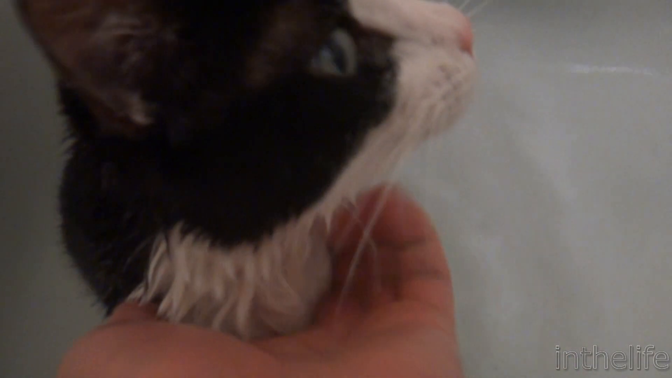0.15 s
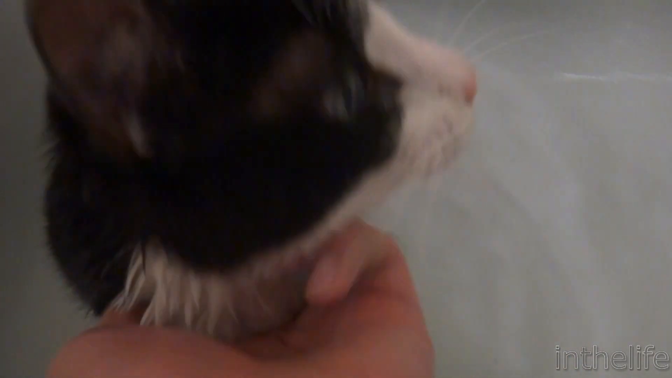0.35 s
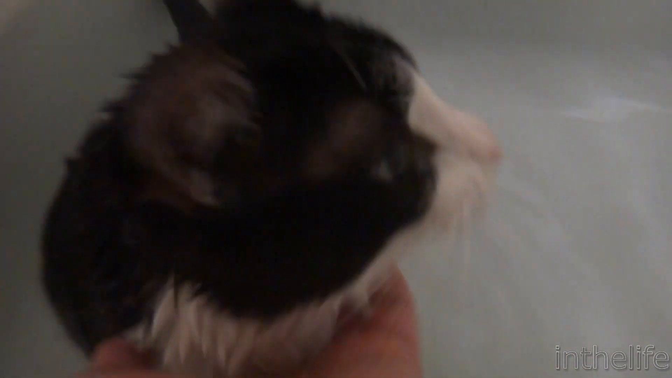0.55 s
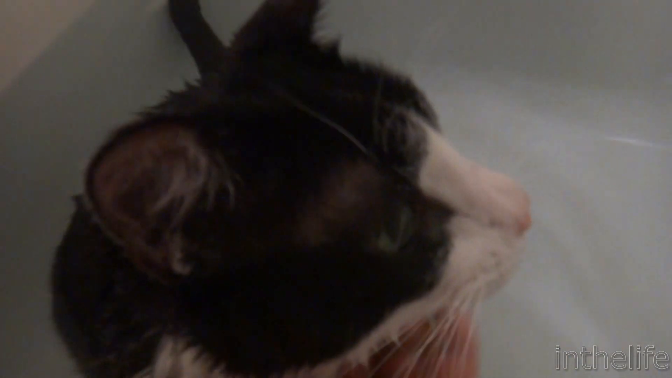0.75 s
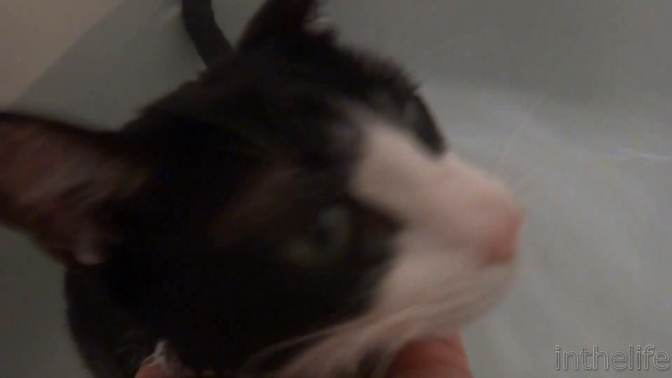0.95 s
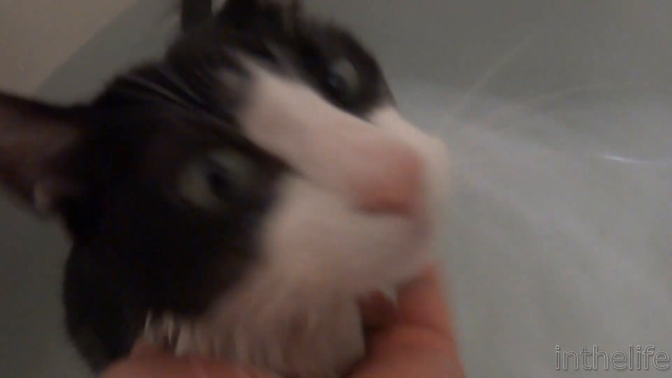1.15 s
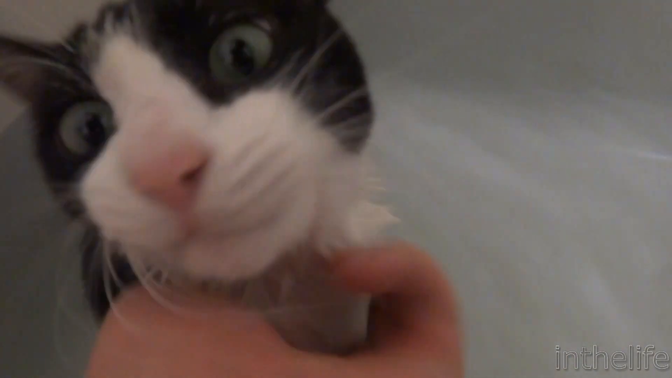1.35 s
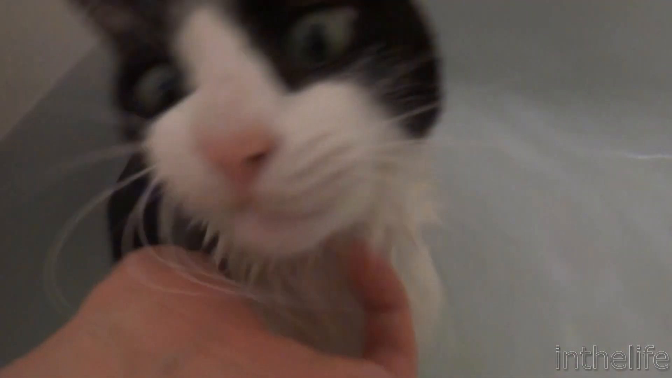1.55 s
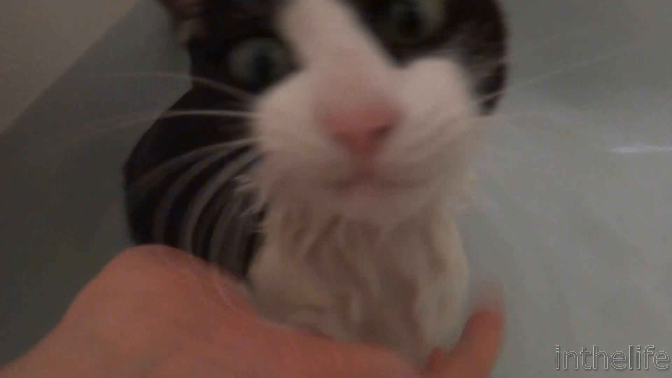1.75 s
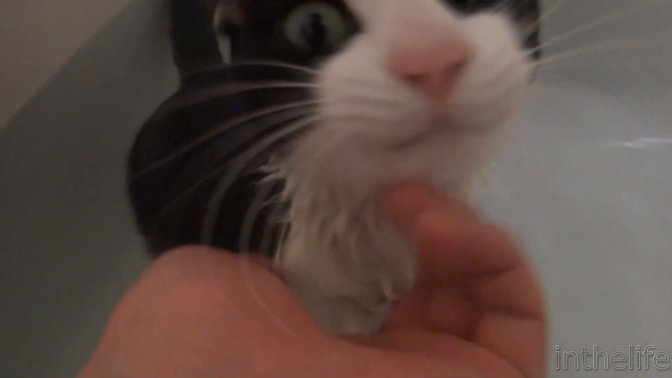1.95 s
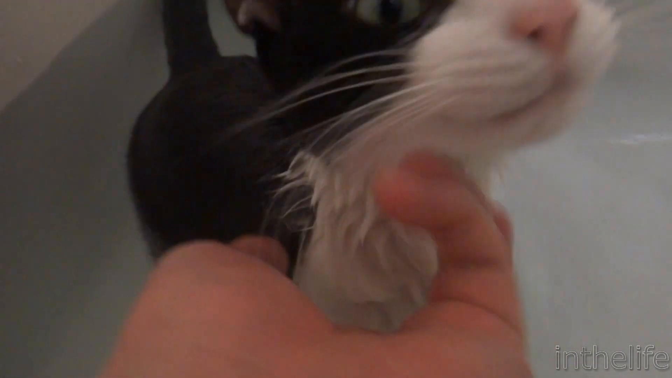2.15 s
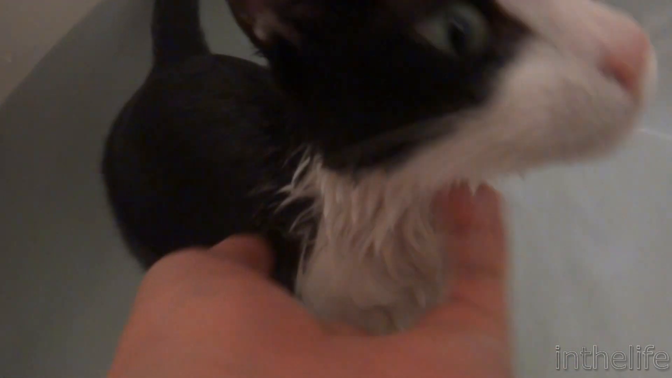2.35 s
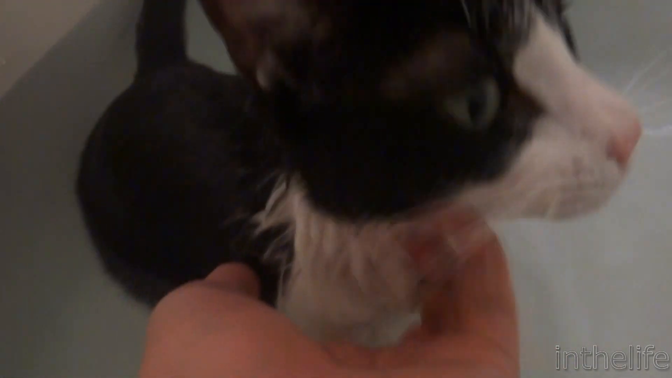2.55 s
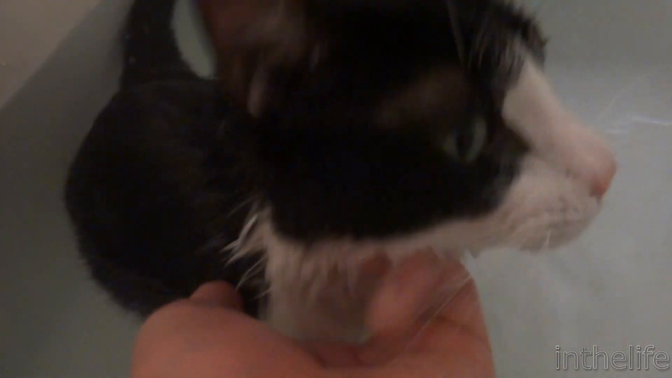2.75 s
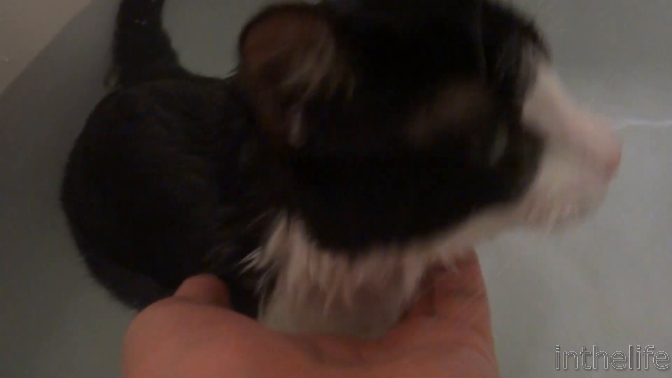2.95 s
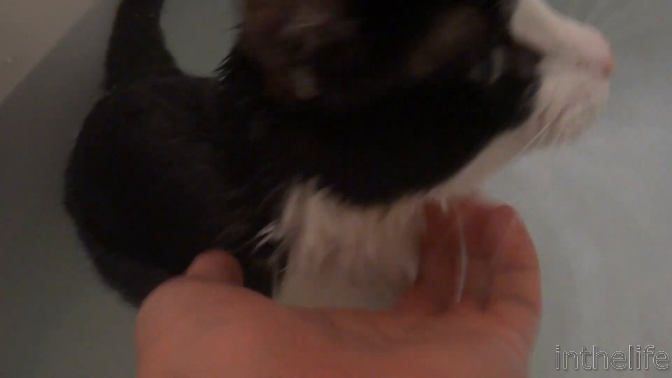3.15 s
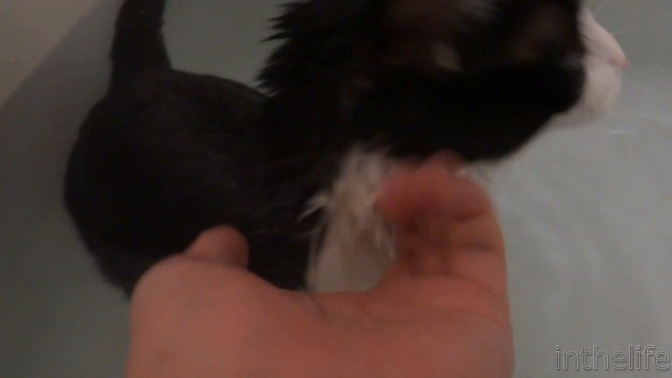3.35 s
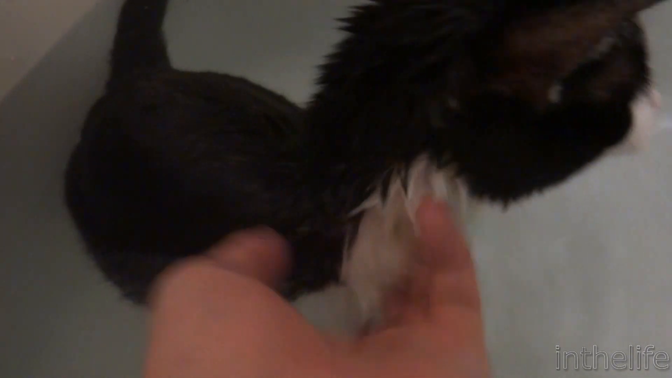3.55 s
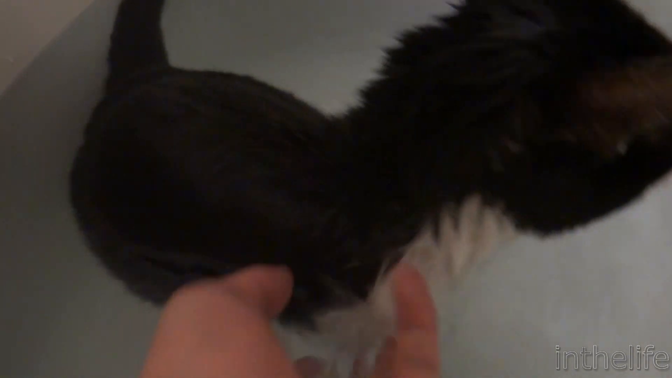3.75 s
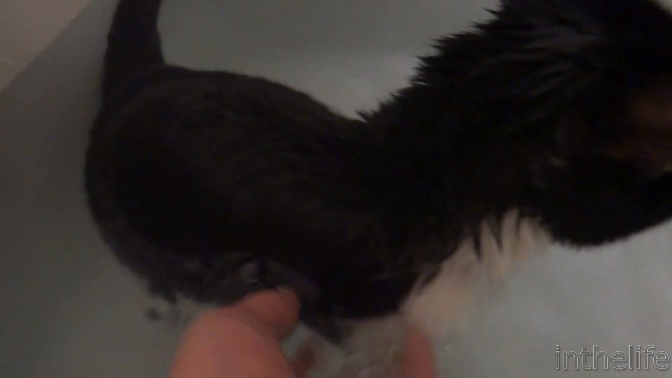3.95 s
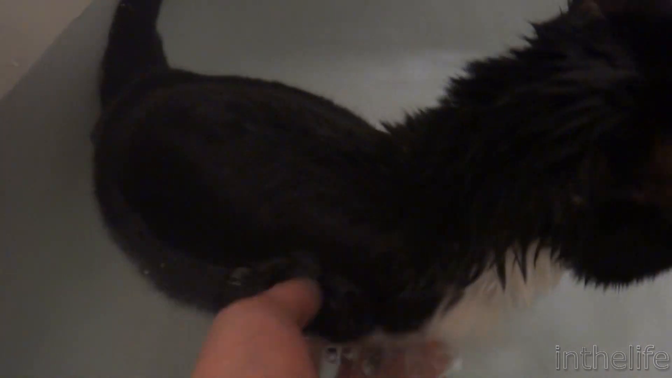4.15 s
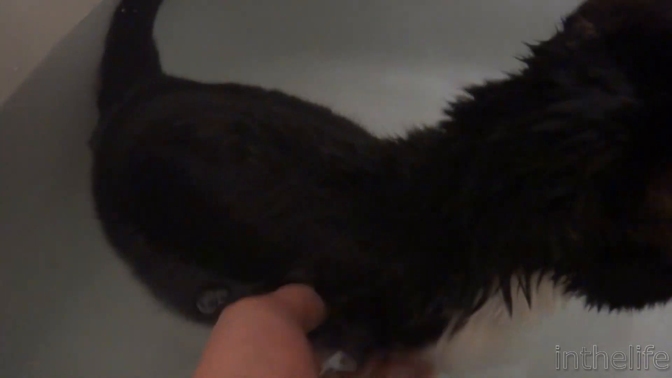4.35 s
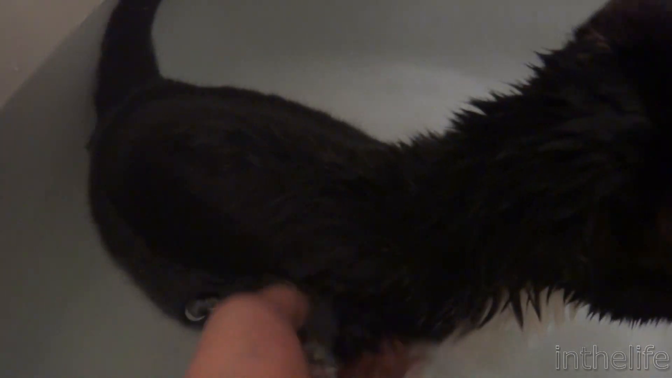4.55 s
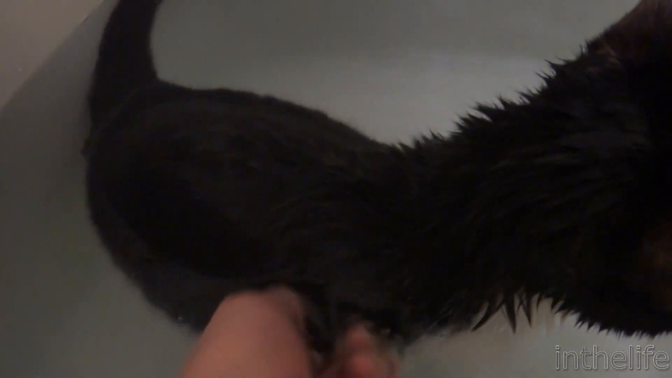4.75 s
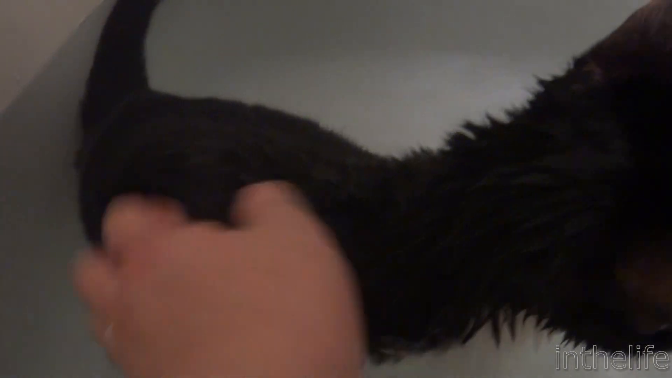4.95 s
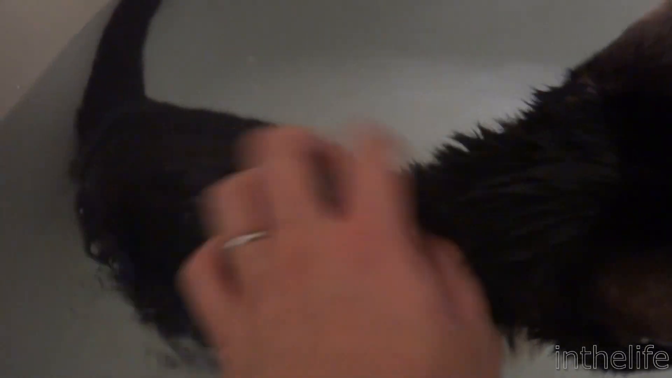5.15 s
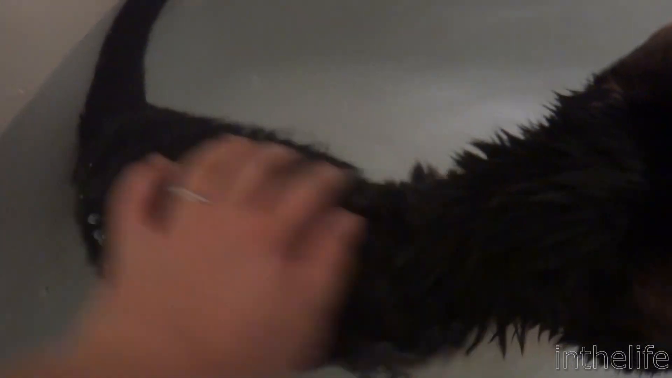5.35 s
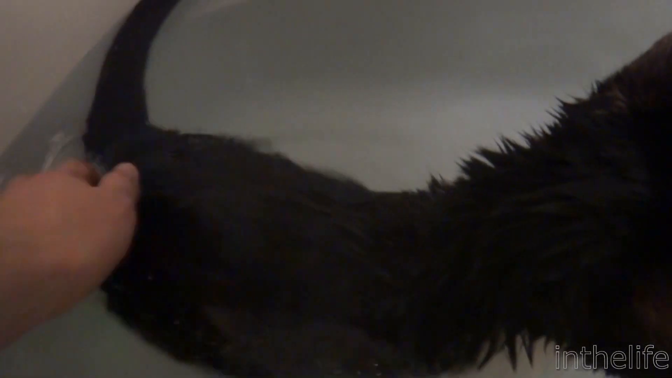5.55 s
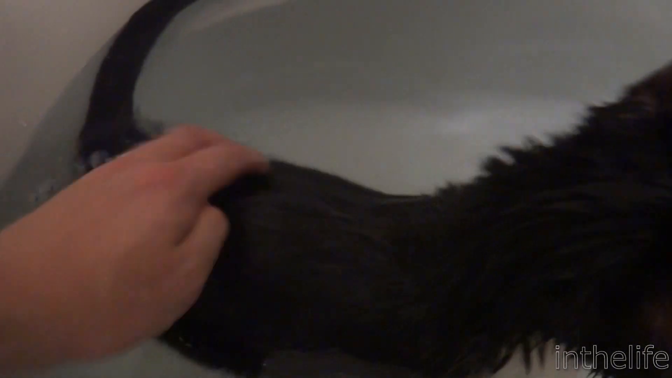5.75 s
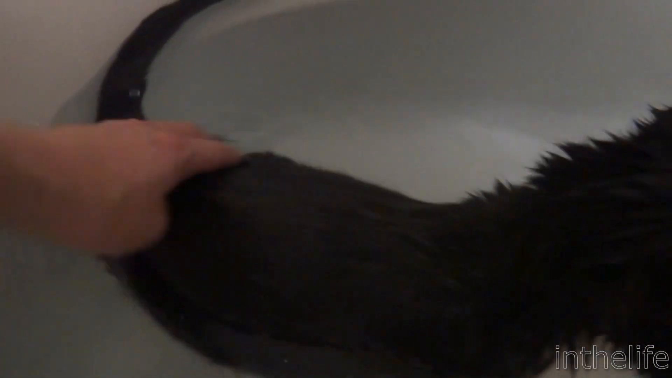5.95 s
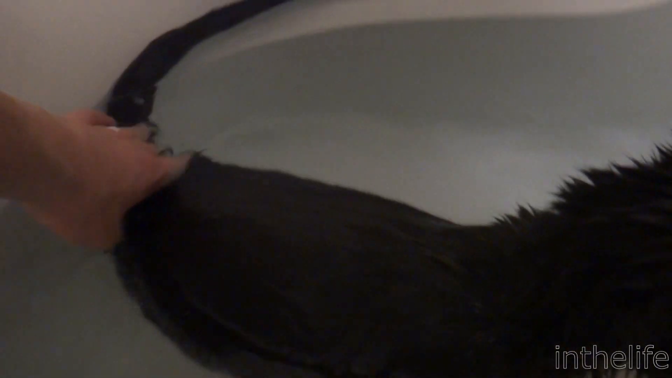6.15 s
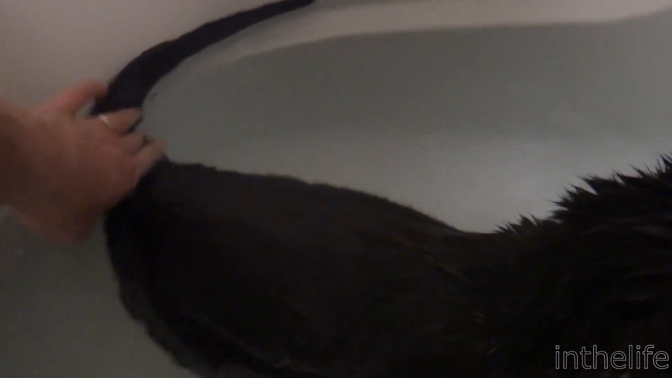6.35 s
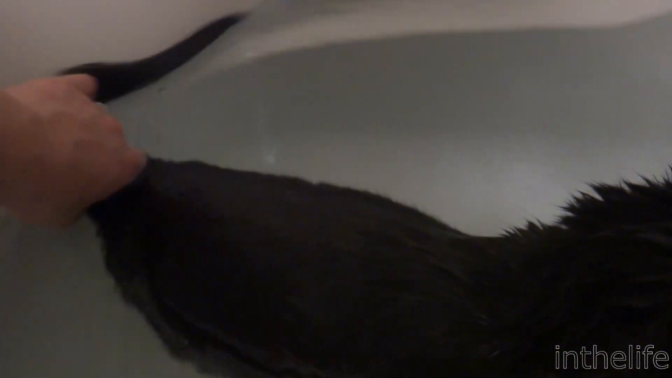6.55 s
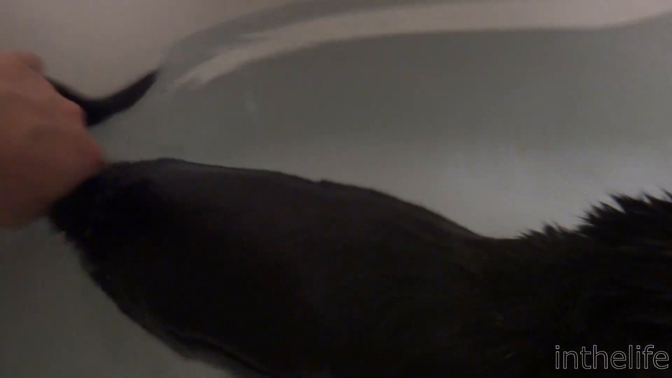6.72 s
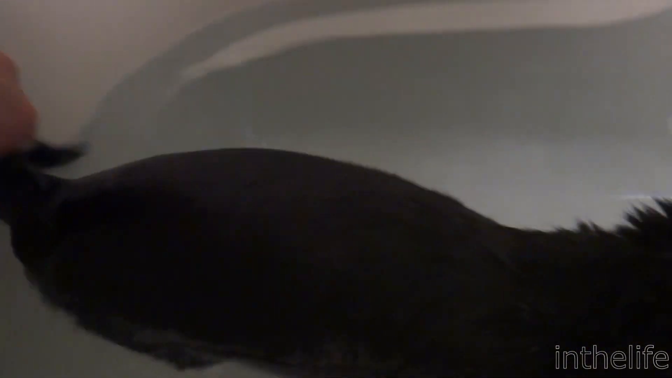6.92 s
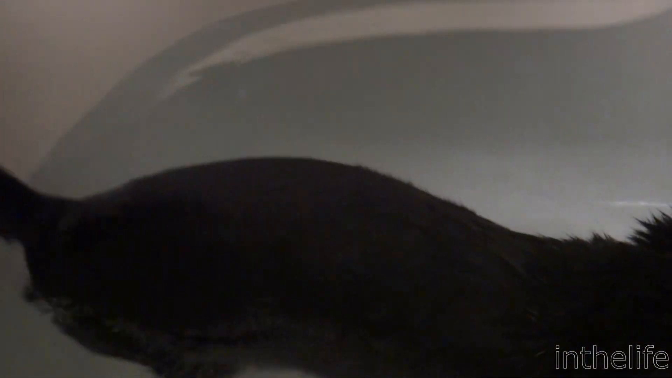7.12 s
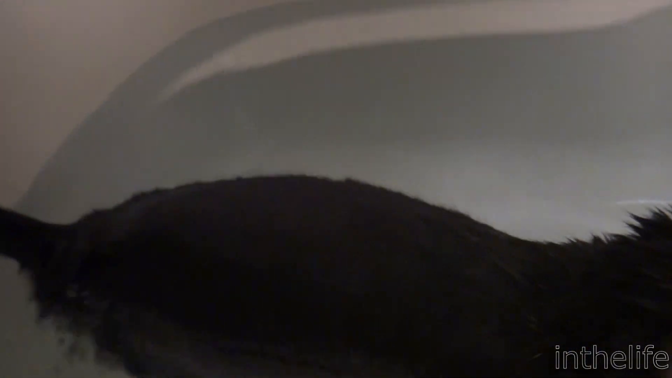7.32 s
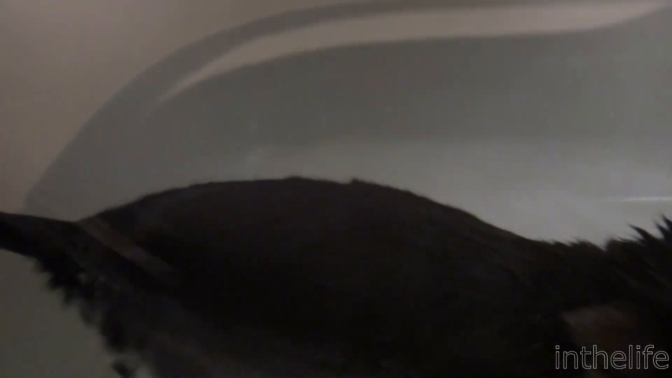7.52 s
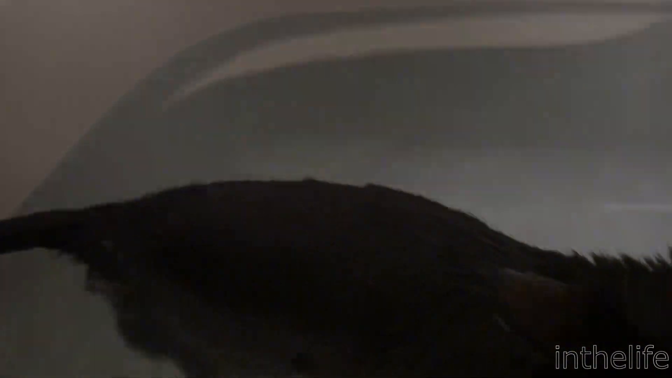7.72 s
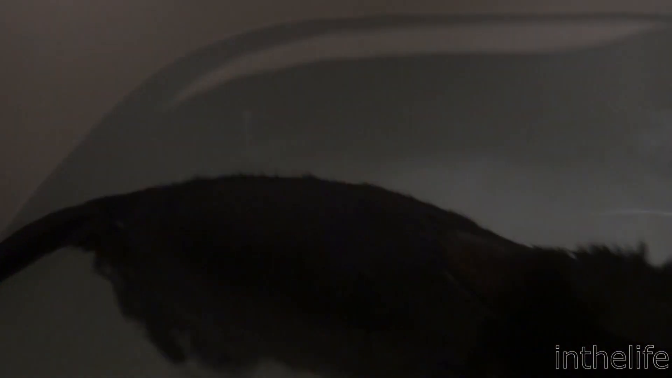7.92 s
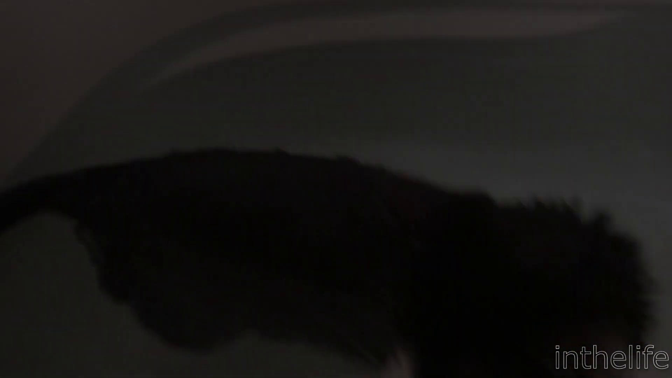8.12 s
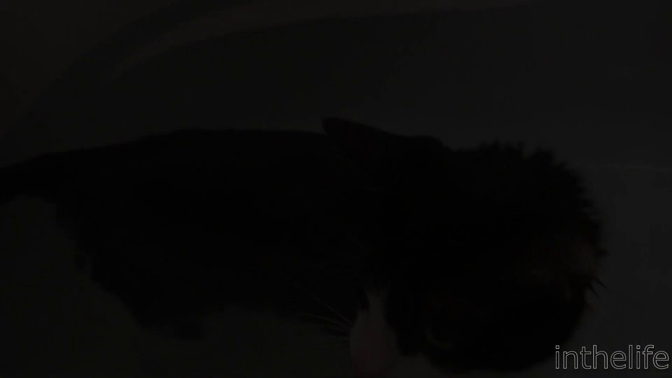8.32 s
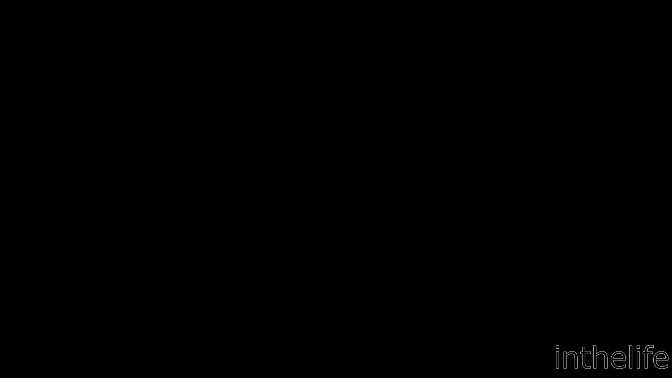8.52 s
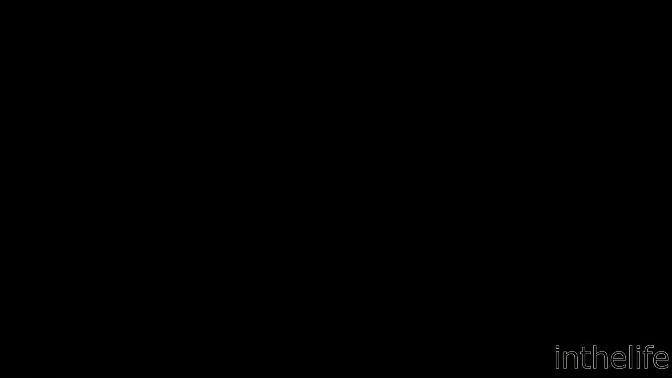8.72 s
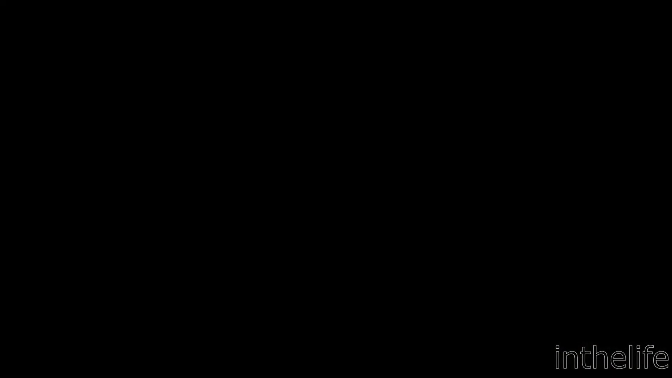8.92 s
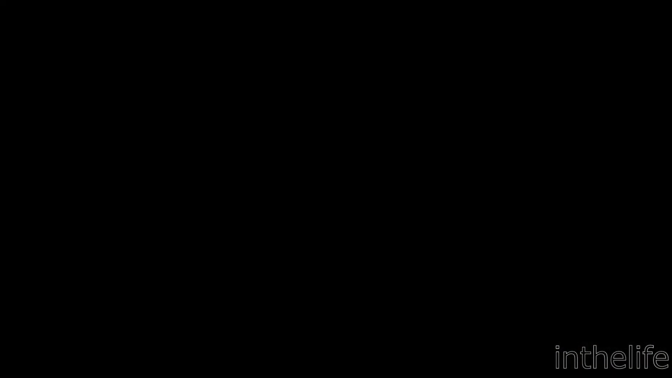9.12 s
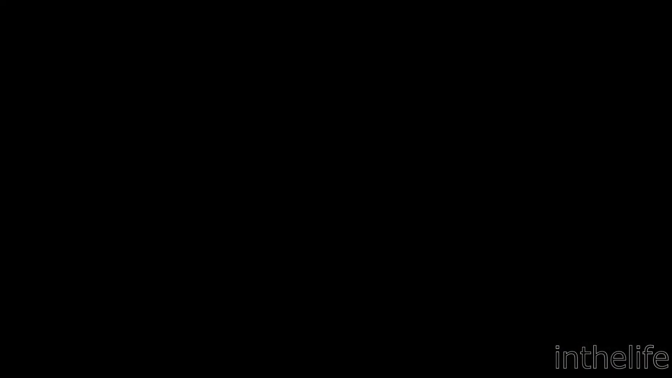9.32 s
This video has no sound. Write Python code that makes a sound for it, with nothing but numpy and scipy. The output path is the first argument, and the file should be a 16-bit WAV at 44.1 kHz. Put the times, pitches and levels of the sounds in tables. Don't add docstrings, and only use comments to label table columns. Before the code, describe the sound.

Wet fur rustles softly, then scattered water drops and brief splashes ring in a tiled bathroom above a small camera's steady whirring motor noise.

```python
import sys
import numpy as np
from scipy import signal
from scipy.fft import rfft, irfft, next_fast_len
from scipy.io import wavfile
from scipy.ndimage import uniform_filter1d

SR = 44100
rng = np.random.default_rng(int(sys.argv[2]) if len(sys.argv) > 2 else 0)


def natural_amplitude(level_db):
    exponent = np.asarray(level_db, float) / 20
    return 10 ** exponent


def transcribe(signal):
    frames = np.atleast_2d(signal).T
    limited = np.clip(frames, -1, 1)
    pcm = np.round(limited * 32767).astype(np.int16)
    wavfile.write(sys.argv[1], SR, pcm)


N = 413658
TURN_HZ = 29.97
SPECK_CYCLES = 17


def evened(x):
    return x / np.sqrt(np.mean(x ** 2) + 1e-20)


def read(points, hz, order=1):
    columns = np.transpose(points)
    return np.interp(np.log(hz + 1), np.log(columns[0] + 1), columns[order])


def over_time(points, t):
    return natural_amplitude(np.interp(t, *np.transpose(points)))


def add(mix, s, sound):
    part = mix[..., round(s * SR):][..., :sound.shape[-1]]
    part += sound[..., :part.shape[-1]]


def colour(x, points):
    size = next_fast_len(N)
    gain = natural_amplitude(read(points, np.fft.rfftfreq(size, 1 / SR)))
    return irfft(rfft(x, size) * gain, size)[..., :N]


def ports(mid, side):
    return np.array([mid + side, mid - side])


def bubble(db, hz, t60_ms, rise, soft_cycles=0.15):
    t60 = max(t60_ms, .8) / 1000
    t = np.arange(int(t60 * SR) + 8) / SR
    glide = rise * (np.minimum(6 * t / t60, 2.5) - .25)
    pitch = np.minimum(hz * 2 ** glide, 16500)
    onset = 1 - np.exp(-(t + 1 / SR) * hz / soft_cycles)
    return natural_amplitude(db + 3.5 - 60 * t / t60) * onset * np.sin(2 * np.pi * np.cumsum(pitch) / SR)


def spatter(db, hz, t60):
    crackle = np.clip(rng.standard_normal(600) ** 3 / 4, -1.5, 1.5)
    crackle *= natural_amplitude(db - 60 * np.arange(600) / SR / t60)
    pole = np.exp(-2 * np.pi * min(hz, 7000) / SR)
    above = signal.lfilter([1, -2, 1], [1, -2 * pole, pole ** 2], crackle) * (1 + pole) ** 2 / 4
    return np.convolve(above, [.5, .5])


def speck(db, hz, cycles):
    out = np.zeros(1000)
    add(out, 0, -bubble(db + 1.5, hz, 1000 * cycles / hz, -.02, soft_cycles=0.38))
    add(out, 0, spatter(db - 7.0, 0.6 * hz, t60=0.0039))
    return out


def impact(out, s, db, hz, t60_ms, rise):
    add(out, s, -bubble(db, hz, t60_ms, rise, soft_cycles=0.27))
    sudden_db = db - t60_ms / 6
    tick = np.diff(signal.windows.hann(6), 2)
    add(out, s, natural_amplitude(sudden_db - 22.0) * tick)
    add(out, s, spatter(sudden_db - 5.0, 0.42 * hz, t60=0.012))
    add(out, s, speck(sudden_db - 16, 9400 * rng.uniform(.9, 1.3), SPECK_CYCLES))


def fizz(shape, hz, per_s, grainy, octaves):
    size = len(shape)
    grains = np.zeros(size + 2000)
    for at, spread, big, rise in rng.random((int(per_s * size / SR) + 1, 4)):
        pitch = min(hz * 2 ** (octaves * (2 * spread - 1)), 14500)
        grain_db = 3.7 * min(-np.log(big), 3.5)
        add(grains, at * size / SR, bubble(grain_db, pitch, 24000 / pitch, 0.42 * rise))
    edges = [hz / 2 ** octaves, min(hz * 2 ** octaves, 16000)]
    hiss_band = signal.lfilter(*signal.butter(2, edges, "bandpass", fs=SR), rng.standard_normal(size))
    share = np.clip(grainy, 0, 1)
    return shape * (np.sqrt(share) * evened(grains[:size]) + np.sqrt(1 - share) * evened(hiss_band))


def house():
    # f/Hz, level/dB per Hz
    air_curve = [(15, -39.5), (25, -4), (81, -4.5), (135, -4.5), (173, -6), (305, -0.5), (420, -4),
                 (550, -16), (920, -120)]
    mid, side = colour(rng.standard_normal((2, N)), air_curve)
    return natural_amplitude(-52) * ports(evened(mid), 0.15 * evened(side))


def drive():
    # f/Hz, level/dB per Hz
    case_mid = [(250, -41.5), (420, -19.5), (679, -1.5), (754, -10.5), (919, 1.5), (1080, -12.5), (1330, 1),
                (1530, -12.5), (1970, -12.5), (2340, -19.5), (3250, -7.5), (4000, -27.5), (5200, -53.5),
                (8800, -120)]
    # f/Hz, level/dB per Hz
    case_side = [(18, -66), (30, -47.5), (268, -21), (404, -8.5), (506, -9.5), (731, -1.5), (861, -10.5),
                 (974, 1.5), (1170, -15), (1300, -14.5), (1630, -17), (1800, -17.5), (2450, -30),
                 (3260, -21), (4000, -44.5), (5200, -69), (8800, -120)]
    # f/Hz, likeness 0-1, lead of side/rad
    side_link = [(59.9, .6, 9), (220, .1, -0.5), (350, 0.7, -0.5), (600, .9, -1), (850, .8, -2),
                 (980, .9, 0), (1125, .4, -1.3), (1287, .9, -3), (1460, 0.7, 0.5), (1900, 1, -2.5),
                 (2400, .2, 3.5), (3200, .9, -7), (3900, .2, 12.5)]
    # t/s, level/dB
    grip_damping = [(0, 0), (.4, -1), (.8, -1.5), (1.2, 0), (9, 0)]
    size = next_fast_len(N)
    hz = np.fft.rfftfreq(size, 1 / SR)
    flutter = natural_amplitude(0.9 * evened(uniform_filter1d(rng.standard_normal(size), 500)))
    shared, own = rfft(rng.standard_normal((2, size)) * flutter)
    like = np.clip(read(side_link, hz), 0, 1)
    lead = np.exp(1j * read(side_link, hz, order=2))
    side = like * lead * shared + np.sqrt(1 - like ** 2) * own
    mid = evened(irfft(shared * natural_amplitude(read(case_mid, hz)), size)[:N])
    side = evened(irfft(side * natural_amplitude(read(case_side, hz)), size)[:N])
    return over_time(grip_damping, np.arange(N) / SR) * ports(natural_amplitude(-44) * mid, natural_amplitude(-39) * side)


def hiss():
    # f/Hz, level/dB per Hz
    hiss_curve = [(2120, -33), (3600, -30), (3950, -3), (6060, -7.5), (7330, -7.5), (7940, -10),
                  (15600, -10)]
    mid, side = colour(rng.standard_normal((2, N)), hiss_curve)
    side = colour(side, [(7000, -1), (14000, -11.5)])
    return natural_amplitude(-57.5) * ports(evened(mid), natural_amplitude(-8) * evened(side))


def whines():
    # f/Hz, level/dB rms, depth at one throb a turn, depth at two, right port [factor]
    whine_table = [(150.3, -61.5, 0, .1, .9), (120.3, -65, 0, .1, .9), (4885, -84, 1.5, 0, -.2),
                   (7192.8, -76, .6, .2, .5), (7372.6, -72, .2, 1., .4), (9830, -88, .5, .3, .6),
                   (12288, -82, .8, .4, .5), (13486.5, -79, 1., .4, .4), (15734.3, -71, 0, 0, .97)]
    # t/s, level/dB
    whine_sag = [(0, 1.5), (3.5, 1.5), (4.5, -3), (9, -3)]
    out = np.zeros((2, N))
    t = np.arange(N) / SR
    once = np.cos(2 * np.pi * TURN_HZ * t)
    twice = np.cos(4 * np.pi * TURN_HZ * t + 1)
    for hz, db, deep1, deep2, right in whine_table:
        tone = np.sin(2 * np.pi * (hz * t + rng.random())) * (1 + deep1 * once + deep2 * twice)
        if 7000 < hz < 7500:
            tone = tone * over_time(whine_sag, t)
        out += np.sqrt(2) * natural_amplitude(db) * np.array([[2 - right], [right]]) * tone
    half = np.cos(np.pi * TURN_HZ * t) + 0.9 * np.cos(3 * np.pi * TURN_HZ * t)
    return out + natural_amplitude(-70) * np.array([[1.5], [.5]]) * half * np.sin(2 * np.pi * 6758.3 * t)


def scratches():
    # middle t/s, level/dB, brightest f/Hz
    strokes = [(.05, -55.5, 5400), (.3, -54, 5470), (0.599, -57, 4960), (.89, -56.5, 6660),
               (1.229, -58, 7000), (1.449, -56.5, 8000), (1.601, -51, 7000), (2.1, -61, 8980),
               (2.2, -52.5, 8000), (2.33, -55, 8920), (2.45, -56.5, 9100), (2.601, -57, 9000),
               (2.73, -54, 7000), (2.941, -54.5, 6070), (3.02, -56, 7000), (3.18, -61, 8900),
               (3.31, -56.5, 7000), (3.559, -58, 6000), (4.52, -58.5, 9110), (5.301, -57.5, 7890),
               (5.417, -49, 7900), (7.04, -48.5, 4000), (7.2, -56, 7000)]
    out = np.zeros(N)
    swell = np.hanning(int(.09 * SR))
    for s, db, hz in strokes:
        add(out, s - .045, natural_amplitude(db) * fizz(swell, hz, 400, grainy=.4, octaves=.8))
    return out


def drips():
    # t/s, peak level/dB, pitch f/Hz
    drip_table = [(.303, -38, 4600), (1.744, -24.5, 4700), (1.7443, -23.5, 7070), (1.7586, -26.5, 4400),
                  (1.8923, -17.5, 5780), (2.0188, -31.5, 5570), (2.9312, -30.5, 5000), (3.4055, -40, 6500),
                  (3.435, -38, 7500), (3.577, -42, 4760), (3.7055, -19, 5650), (3.7366, -25, 5200),
                  (3.9636, -21.5, 5100), (4.2945, -28.5, 6900), (4.5275, -38.5, 6000), (4.587, -40, 5300),
                  (4.8707, -36, 4730), (5.8115, -36, 3800), (5.5495, -28, 3780), (5.528, -25, 5270),
                  (5.473, -26.5, 6200), (5.591, -37, 7000), (5.752, -41, 7200), (8.1725, -37, 5600),
                  (8.12, -39, 7500), (7.9195, -27, 4400), (7.921, -31, 6600), (7.939, -27.5, 4300),
                  (6.9787, -39, 7500), (7.073, -41, 5600), (5.898, -45, 6700), (7.1947, -43, 4600),
                  (1.7005, -36, 4510), (2.3017, -43, 4480), (2.6145, -40, 4810), (3.1852, -39, 6800),
                  (.7542, -46, 5000), (4.079, -35.5, 4600), (7.828, -28.5, 5600), (7.843, -25, 6000),
                  (4.463, -25, 6500), (4.5087, -33.5, 5500), (4.7068, -29.5, 7400), (5.0166, -31.5, 5300),
                  (5.079, -33, 5900), (5.4998, -21, 7180), (5.5257, -25, 4560), (5.514, -26, 4400),
                  (5.501, -27, 4400), (5.6086, -19, 5650), (5.6792, -25.5, 7000), (7.5522, -24.5, 7140),
                  (7.665, -23.5, 7400), (7.8373, -20.5, 7200), (7.9471, -14, 4730), (7.9718, -27, 4750),
                  (8.0035, -16, 5830), (8.0473, -28.5, 5070), (8.1795, -18.5, 7050)]
    out = np.zeros(N)
    for s, db, hz in drip_table:
        add(out, s, speck(db, hz, cycles=22))
    return out


def bumps():
    # t/s, peak level/dB, swing f/Hz
    shifts = [
        (0.864, -42, 130),
        (1.385, -39, 130),
        (3.078, -41.5, 80.1),
        (3.881, -35, 80.3),
        (5.099, -33, 90),
        (5.668, -44, 140),
        (6.026, -35, 190),
        (7.62, -35, 199),
    ]
    # f/Hz, level over the swing/dB, t60/ms
    knock_modes = [(420, -6.5, 16), (1150, -10, 10)]
    out = np.zeros(N)
    for s, db, hz in shifts:
        turn = np.arange(int(1.6 * SR / hz)) * hz / SR
        envelope = np.exp(-turn / 0.58) * np.minimum(turn / 0.29, 1)
        add(out, s, -natural_amplitude(db + 9.0) * np.sin(2 * np.pi * turn) * envelope)
        for knock_hz, knock_db, t60_ms in knock_modes:
            add(out, s + 0.0032, hz / 190 * bubble(db + knock_db + 4.5, knock_hz, t60_ms, 0))
    return ports(out, 0.19 * out)


def gulps():
    # t/s, peak level/dB, pitch f/Hz, t60/ms, rise/octaves
    gulp_table = [(1.684, -34, 2090, 30, 0.014), (3.673, -33.5, 2110, 26, -0.078), (4.727, -33, 2310, 40, 0.3),
                  (4.7285, -33, 3300, 12, .1), (3.7411, -25.5, 1040, 35, -0.1),
                  (3.9339, -22.5, 1660, 8.8, -0.36), (3.9637, -13, 2063, 28, -0.068),
                  (3.958, -28.5, 4000, 6, 0.45), (3.937, -30.5, 2100, 50, 0.05),
                  (4.161, -18.5, 934, 23, -0.15), (4.1722, -17, 972, 41, 0.12), (4.178, -25, 1250, 70, .3),
                  (4.3552, -10, 4660, 8.5, -.01), (4.366, -46, 4560, 200, .01), (4.39, -47, 4690, 200, -.01),
                  (5.64, -45, 4330, 160, .01), (5.72, -45, 2400, 200, 0), (4.5625, -31, 740, 70, 0.1),
                  (4.627, -39, 850, 45, 0.15), (4.6325, -31.5, 1120, 70, 0.5), (4.9101, -27, 1570, 17, -0.13),
                  (4.923, -33.5, 2350, 25, -0.12), (4.961, -31, 2750, 20, -.04),
                  (5.5037, -23, 1820, 17, 0.019), (5.5112, -32, 920, 39, -0.16),
                  (5.5296, -30.5, 2660, 25, -.02), (5.5842, -32, 2520, 20, .05),
                  (5.627, -30.5, 1690, 40, -0.16), (5.6814, -27, 2246, 28, 0.088),
                  (7.8699, -21.5, 471, 86, 0.074), (7.8814, -27.5, 1020, 34, 0.052),
                  (8.074, -20, 2880, 14, 0.14), (8.0757, -14, 3100, 13, .05), (8.077, -20, 2450, 14, 0)]
    out = np.zeros(N)
    for s, db, hz, t60_ms, rise in gulp_table:
        impact(out, s, db, hz, t60_ms, rise)
    return out


def splashes():
    # start t/s, level/dB, length/s, brightest f/Hz
    sheets = [(1.738, -44, .04, 10500), (3.903, -56, 0.16, 4960), (4.184, -57, 0.086, 10000),
              (5.463, -38, 0.032, 9460), (5.497, -32.5, 0.078, 3560), (5.597, -36.5, .125, 4360),
              (5.599, -44.5, 0.14, 10000), (5.746, -56.5, .8, 10280), (6.07, -57, .08, 13500),
              (6.905, -58, .07, 13000), (6.708, -63.5, 0.46, 11230), (7.417, -48, 0.091, 5300),
              (7.461, -48, 0.092, 11000), (7.662, -28.5, .009, 4500), (7.783, -35.5, 0.054, 3700),
              (7.835, -30, 0.05, 3540), (7.851, -40, 0.22, 9350), (7.947, -32.5, 0.09, 3760),
              (8.099, -56, .3, 9000)]
    out = np.zeros(N)
    for s, db, length, hz in sheets:
        u = np.linspace(0, 1, int(length * SR))
        burst = np.minimum(u / .08, 1) * np.sqrt(1 - u)
        add(out, s, natural_amplitude(db) * fizz(burst, hz, 2200, grainy=.75, octaves=.7))
    return out


def froth():
    # t/s, peak level/dB, pitch f/Hz
    surfacing = [(1.7402, -35, 4700), (3.7273, -33, 2660), (3.853, -30, 4400), (4.187, -33, 1020),
                 (4.152, -35, 2050), (4.2095, -27, 3400), (4.2115, -31, 4000), (4.933, -31.5, 7100),
                 (5.0319, -35.5, 4500), (5.598, -31, 11000), (5.4775, -32, 3350), (5.693, -30, 2400),
                 (5.699, -33, 2400), (5.803, -39, 4530), (5.9334, -41, 4800), (6.027, -34, 1220),
                 (7.226, -36.5, 2580), (7.439, -38, 5530), (7.869, -30, 757), (7.844, -23, 2480),
                 (7.8525, -23, 2600), (7.8483, -22, 3900), (7.852, -27, 4300), (7.864, -28, 3500),
                 (7.9197, -25.5, 2620), (7.969, -29, 2400)]
    out = np.zeros(N)
    for s, db, hz in surfacing:
        add(out, s, -bubble(db, hz, 1000 * 49 / hz, rise=0.16))
    return out


def specks():
    # t/s, peak level/dB, pitch f/Hz
    speck_table = [(1.7582, -17, 9940), (2.0174, -35, 13140), (3.6583, -26.5, 11000), (3.7052, -15, 8760),
                   (3.8529, -29, 9500), (4.0458, -25.5, 9900), (4.1275, -31, 9200), (4.188, -27.5, 11080),
                   (4.2065, -16.5, 11250), (4.2193, -23, 11800), (4.3563, -18, 10910), (4.5698, -32, 12280),
                   (4.6138, -34.5, 8210), (4.8623, -32, 8950), (4.9359, -21, 10040), (5.0843, -21.5, 12080),
                   (5.2772, -34.5, 13500), (5.4675, -8, 9720), (5.4773, -13.5, 10900), (5.652, -24.5, 9530),
                   (5.813, -28.5, 10570), (5.8806, -43.5, 8500), (5.9121, -37, 12300), (6.023, -42, 9500),
                   (6.073, -39, 13950), (6.4748, -41, 8500), (6.662, -42, 10500), (6.9078, -39, 12700),
                   (6.942, -43, 10000), (7.1947, -37, 8920), (7.2815, -41, 9000), (7.857, -26, 8020),
                   (7.92, -25, 10730), (7.935, -29, 10000), (7.9625, -23.5, 8900), (7.9645, -24.5, 10200),
                   (7.9815, -25.5, 8800), (8.003, -24, 10500), (8.067, -27, 8500), (8.11, -34, 9800),
                   (8.133, -31, 10500), (8.243, -31, 10500), (4.5065, -36.5, 8500), (4.873, -34, 9700),
                   (7.467, -26.5, 10920), (7.795, -20.5, 10720), (7.9053, -16, 10800), (7.9471, -10, 9500),
                   (8.042, -19, 12000), (8.179, -25.5, 12410), (8.2118, -27, 9900), (8.4298, -20, 12050),
                   (8.4893, -20, 12570)]
    out = np.zeros(N)
    for s, db, hz in speck_table:
        add(out, s, speck(db, hz, SPECK_CYCLES))
    return out


def plinks():
    # t/s, peak level/dB, pitch f/Hz, t60/ms
    plink_table = [(1.8139, -28, 4050, 4), (2.0105, -30, 2400, 4.6), (3.423, -18.5, 2480, 5.6),
                   (3.4479, -17.5, 2800, 4), (3.45, -15, 2863, 5.8), (3.7051, -23.5, 2260, 11),
                   (3.7115, -24, 1630, 9), (3.7405, -12.5, 2660, 11), (3.806, -29.5, 3320, 14),
                   (3.8275, -17, 2085, 7), (3.8589, -18.5, 3330, 5.7), (3.929, -26.5, 4250, 8),
                   (3.934, -22, 3290, 5.6), (3.967, -15.5, 3200, 10), (3.9944, -26, 3340, 11),
                   (4.0365, -27, 3590, 7), (4.1612, -19, 3600, 4.1), (4.2075, -27, 2900, 6),
                   (4.337, -22, 2230, 12), (4.3475, -31.5, 2150, 12), (4.5, -37.5, 4050, 25),
                   (4.527, -36, 2260, 14), (4.6747, -37, 2240, 12), (4.708, -34, 2400, 8),
                   (7.782, -22, 2550, 9), (3.7175, -31, 5500, 12), (3.748, -25, 2500, 25),
                   (4.0105, -30, 2050, 14), (4.023, -33, 2050, 14), (3.9942, -30, 4200, 6),
                   (4.03, -33.5, 4000, 6), (7.794, -24, 3200, 8), (8.0765, -23, 4600, 10),
                   (4.7249, -28, 2250, 10), (5.5139, -27, 4020, 10), (5.6, -23.5, 3030, 14),
                   (5.616, -25, 4400, 13), (5.9842, -31, 2900, 14), (7.662, -22.5, 3000, 18),
                   (7.7803, -10, 3500, 5.5), (7.8395, -16.5, 2995, 6), (7.8702, -18.5, 3900, 6),
                   (7.946, -16, 2740, 7), (8.071, -15.5, 2990, 10.4)]
    out = np.zeros(N)
    for s, db, hz, t60_ms in plink_table:
        impact(out, s, db, hz, t60_ms, rise=-0.09)
    return out


def squeak():
    # t/s, length/s, level/dB, f/Hz
    slip = (5.965, .035, -50, 11000)
    out = np.zeros(N)
    s, length, db, hz = slip
    t = np.arange(int(length * SR)) / SR
    add(out, s, natural_amplitude(db) * np.sin(2 * np.pi * hz * t) * np.sin(np.pi * t / length))
    return out


def bathroom(x):
    # f/Hz, t60/s, strength level/dB
    tiles = [(400, 0.57, 2), (1497, 0.29, 4), (4500, 0.44, -1), (7000, 0.4, -0.5), (10000, 0.3, 1),
             (15000, 0.072, -1), (15920, 0.18, -41.5)]
    # delay t/s, level/dB
    tub_echoes = [(.0027, -16.5), (.0068, -20), (0.0108, -17.5), (0.016, -18), (.019, -20.5)]
    hz, t, z = signal.stft(rng.standard_normal((2, SR * 3 // 4)), SR, nperseg=256)
    z = z * natural_amplitude(-60 * t / read(tiles, hz)[:, None]) * (1 - np.exp(-t / 0.017))
    tail = signal.istft(z, SR, nperseg=256)[1]
    tail *= natural_amplitude(-10.5) / np.linalg.norm(tail[0])
    for s, db in tub_echoes:
        add(tail, s, natural_amplitude(db) * np.array([[-1.], [.4]]))
    wet = signal.fftconvolve(x[None], tail, axes=1)[:, :N]
    mid, side = colour(wet, [(f, db) for f, _, db in tiles])
    lag = np.diff(x, prepend=0)
    return ports(x + mid, 0.089 * x + .05 * lag + natural_amplitude(-11.5) * side)


def band_edge(x):
    edge_hz = 15770
    return colour(x, [(edge_hz, 0), (edge_hz + 60, -40)])


def scene():
    clicks = drips() + gulps() + specks() + plinks() + squeak()
    stir = scratches() + splashes() + froth()
    steady = house() + drive() + hiss() + whines()
    return bathroom(clicks + band_edge(stir)) + bumps() + band_edge(steady)


def band_limit(x):
    return signal.sosfilt(signal.butter(12, 16830, fs=SR, output="sos"), x)


def record(dry):
    fade_end, fade_length = 8.546, 0.8
    dry = signal.sosfilt(signal.butter(4, 15000, fs=SR, output="sos"), dry)
    left = (fade_end - np.arange(N) / SR) / fade_length
    return band_limit(dry * np.clip(left, 0, 1) ** 1.214)


dry = scene()
out = record(dry)
transcribe(out)
```